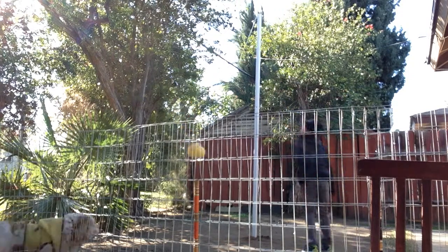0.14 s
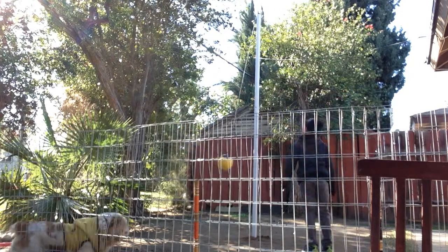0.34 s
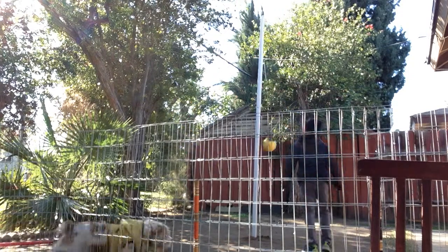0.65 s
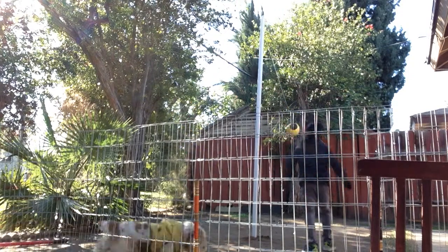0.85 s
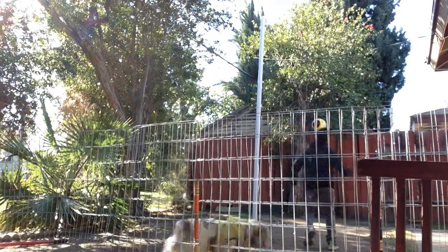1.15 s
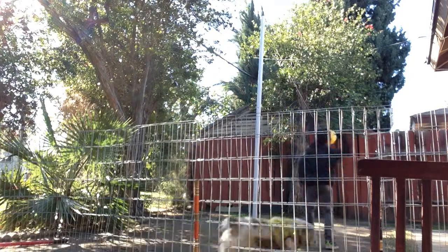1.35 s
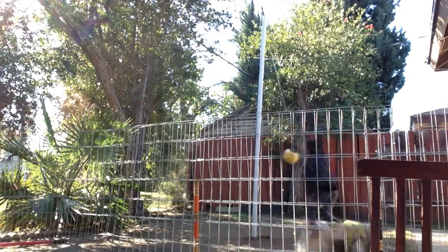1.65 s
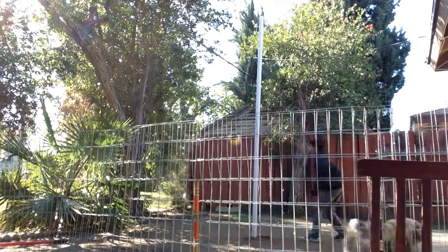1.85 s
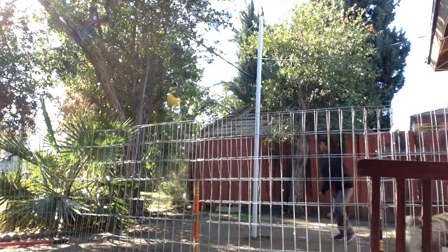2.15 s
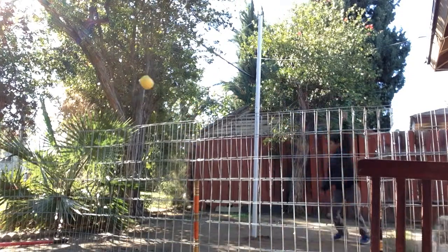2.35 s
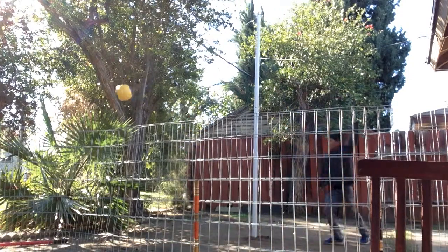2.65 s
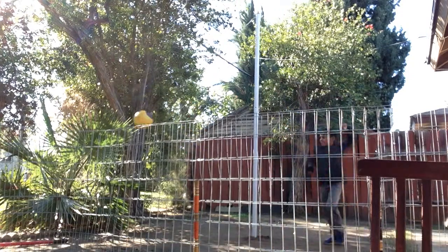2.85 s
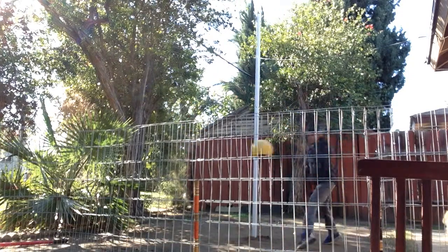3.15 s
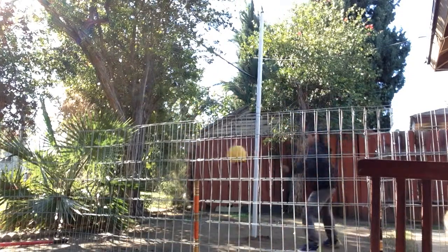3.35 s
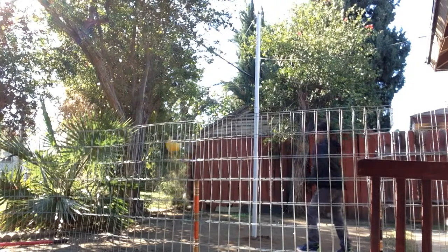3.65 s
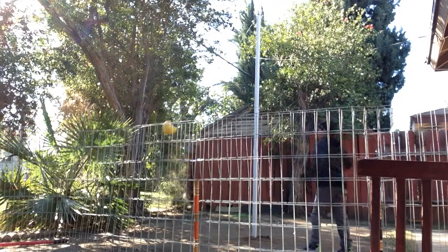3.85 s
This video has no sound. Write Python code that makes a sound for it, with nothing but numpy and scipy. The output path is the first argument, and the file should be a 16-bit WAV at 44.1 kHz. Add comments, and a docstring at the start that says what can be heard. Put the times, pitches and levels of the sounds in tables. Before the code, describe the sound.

A tetherball is played in a quiet yard with a short echo. The rope's metal fitting clinks on the pole early on, and the rope whooshes faintly at 1 second. A hand slaps the hollow ball at 1.6 seconds and harder at 3.3, each a thump with a ping. Ringing clinks recur, loudest at 2.3 and 3.4 seconds. Shoes scuff and pad softly over a faint outdoor hush.

```python
"""Tetherball in a fenced back yard

A hand slaps the hollow ball twice, making it thump and ping. The rope's metal fitting clinks on
the pole and sets it ringing, and the rope whooshes once through the air. Shoes scuff and pad on
the ground over a faint outdoor hush. The fences and the house wall throw the sound back."""
import sys
import numpy as np
from scipy import signal
from scipy.fft import rfft, irfft, next_fast_len
from scipy.io import wavfile
from scipy.ndimage import uniform_filter1d

SR = 44100
rng = np.random.default_rng(int(sys.argv[2]) if len(sys.argv) > 2 else 0)


def log_audio(samples):
    """Write samples as a 16-bit WAV file to the path given in sys.argv[1]."""
    # one column per channel
    frames = np.atleast_2d(samples).T
    # limit to full scale, then quantise
    limited = np.clip(frames, -1, 1)
    pcm = np.round(limited * 32767).astype(np.int16)
    wavfile.write(sys.argv[1], SR, pcm)


N = 176400
T = np.arange(N) / SR
AGE = T[:SR]  # seconds since a sound began

# Levels in the tables are relative. A fade time is how long a sound takes to drop by 60 dB.
# Tone curves of the hush, the fitting's chatter, a scuff, a step, the palm's push and the crack
# on the ball's skin. Each row: frequency in Hz, level in dB.
HUSH_TONE = [(25, -57), (50, -27), (100, -11), (190, 2), (450, -7.5), (1000, -7.5), (1600, -14),
             (3000, -19.5), (6000, -23.5), (11000, -25.5), (15500, -29.5)]
CLINK_TONE = [(200, -24), (700, -14.5), (1050, -3.5), (1750, -6), (2300, -10.5), (3100, -7.5), (4100, -10),
              (5300, -3), (7200, -8), (8600, -4), (10200, -8.5), (12000, -6.5), (15500, -21)]
SCUFF_TONE = [(80, -26), (220, -5.5), (600, -1.5), (1200, -2), (2000, -1.5), (3000, -0.5), (4000, -5.5),
              (5500, -7.5), (8000, -16), (15000, -26.5)]
STEP_TONE = [(40, -19), (100, -3.5), (220, 2), (450, -3), (900, -23.5), (2500, -30.5), (10000, -43)]
SLAP_TONE = [(40, -21), (80, 20.5), (140, 15), (280, 21.5), (600, 9.5), (1100, 7.5), (2400, -6),
             (5000, -36), (16000, -102)]
CRACK_TONE = [(500, -43), (1800, -9), (3100, -3), (4300, -7.5), (7500, -4.5), (10000, -15), (15000, -22.5)]
# The notes of the fitting and of the pole. Each row: pitch in Hz, level in dB, fade time in seconds.
FITTING_NOTES = [(1720, -45, .04), (5480, -45, .05), (5650, -46, .09), (8450, -45, .05), (8885, -44, .07),
                 (9170, -43, .08), (11520, -50, .08), (12315, -49, .09)]
POLE_NOTES = [(1025, -61, .4), (2810, -63, .26), (4785, -57.5, 1.0), (4855, -52, .3), (4994, -55, .16),
              (7675, -52, .34), (7718, -47.5, .33), (8280, -51, .15), (11350, -57, .18)]
# The notes that ring after each slap, from the ball and the yard. Each row: pitch in Hz,
# level in dB, fade time in seconds.
SLAP_NOTES = [(80, -31, .18), (268, -33, .3), (357, -29.5, .09), (432, -32, .15), (475, -33, .17),
              (547, -33, .15), (610, -34, .17), (701, -36, .16), (936, -39, .2), (1125, -34, .1),
              (1238, -36, .12), (1324, -34, .1), (1420, -33, .12), (1530, -36, .07), (1685, -38, .08),
              (1916, -37, .08), (2010, -35, .08), (3036, -40, .09)]
# How the hush swells and sinks. Each row: time in seconds, level in dB.
HUSH_SWELLS = [(0, -1), (.35, -0.5), (.5, -3), (.68, 0), (1.0, -1.5), (1.35, -1.5), (1.9, 1.5), (2.2, -1),
               (2.9, -.5), (3.15, -1.5), (3.5, 4.5), (4, -1.5)]
# The fitting hits the pole. Each row: start in seconds, level in dB, rattle time in seconds,
# then low knock, treble, fitting ring and pole ring, all in dB.
POLE_HITS = [(0.123, -17.5, 0.0066, -8.5, -15.5, -12, -12), (0.6978, -9, 0.0015, -3.5, -12, 4, -8),
             (1.744, -19, 0.0069, -4, -2.5, -15, -8), (2.2807, -0.5, 0.0055, 0.5, 3, 12.5, -4),
             (2.569, -21, .005, 5, -9, -15, -21), (3.009, -22.5, 0.0055, 0, -7.5, 5, -3),
             (3.353, -14.5, 0.0072, -30, 2.5, -10, 2), (3.4472, -1.5, 0.00085, -5, -3, -14, 6.5),
             (3.739, -26, 0.0025, 4, 12, 11, -24), (3.8573, -17.5, 0.0028, 2.5, 0, 8, -14)]
# Shoes drag. Each row: peak, rise and fall times in seconds, then level, bass and grit in dB.
SHOE_DRAGS = [(.235, 0.067, 0.047, -54.5, 10, -5), (0.974, 0.035, 0.074, -59, 1, 12.5),
              (1.458, 0.022, 0.025, -52.5, -2.5, -1), (1.84, 0.017, 0.0098, -58.5, 2, 11.5),
              (1.952, 0.021, 0.02, -48.5, 3.5, 1.5), (2.671, 0.019, 0.008, -46, 7, -2.5),
              (3.618, 0.038, 0.029, -42.5, 9, -1.5), (3.86, 0.045, 0.069, -58.5, -3, 6)]
# Feet land. Each row: start in seconds, level in dB, settling time in seconds, brightness in dB.
FOOTFALLS = [(0.711, -6, 0.02, -11), (0.815, -7, 0.21, -13), (0.941, -7, .035, -18),
             (1.222, -15, 0.0093, -20), (1.888, -18, 0.069, -2), (3.2517, -5.5, 0.0025, 13)]
# The hand hits the ball. Each row: start in seconds, level and slap notes' level in dB, muffling in
# dB per second per kHz, ping in Hz and dB, thump in Hz and dB, the thump's fade time in seconds,
# clap in Hz and dB, crack in dB, echo of the slap and crack in dB.
HAND_HITS = [(1.6358, -7.5, -6, 750, 956, -24, 200, -33, 0.49, 1310, 6.5, 0, -0.5),
             (3.2997, -3.5, 0, 0, 1025, -17, 283, -24, 0.16, 1800, 4.5, 7.5, -2.5)]
# Echoes off the ground, fences and wall. Each row: delay in seconds, level in dB.
YARD_ECHOES = [(.0034, -17), (.0088, -5), (0.014, -10.5), (0.019, -9.5), (.0245, -8), (.0605, -17.5)]
# Sound scattered round the yard. Each row: frequency in Hz, level in dB, fade time in seconds.
YARD_SCATTER = [(100, -2, 0.15), (302, 4.5, 0.32), (970, 5.5, 0.18), (3160, 4, 0.36), (8200, 0, 0.24),
                (16000, 8, 0.17)]


def from_db(db):
    """Turn decibels into a number to multiply by."""
    return 10 ** (np.asarray(db) / 20)


def unit(x):
    """Scale a sound to an energy of one."""
    return x / np.sqrt(np.sum(x ** 2) + 1e-20)


def at_hz(table, hz, column=1):
    """Read between a table's rows, with octaves evenly spaced."""
    rows = np.array(table)
    return np.interp(np.log(hz + 1), np.log(rows[:, 0]), rows[:, column])


def colour(x, *curves):
    """Filter a sound with the sum of the given tone curves."""
    n = next_fast_len(len(x)) * 2
    hz = np.arange(n // 2 + 1) * SR / n
    cepstrum = irfft(np.log(from_db(sum(at_hz(curve, hz) for curve in curves))))
    # Folding this in half keeps the filter from ringing before the sound starts.
    cepstrum[1:n // 2] *= 2
    cepstrum[n // 2 + 1:] = 0
    return irfft(rfft(x, n) * np.exp(rfft(cepstrum)))[:len(x)]


def add(out, start, x):
    """Mix a sound in at its start time in seconds."""
    i = int(np.clip(start * SR, 0, N - 1))
    out[i:i + len(x)] += x[:N - i]


def contact(settle_s, first):
    """Two things meet: a first touch, then a dying run of smaller ones, evened out in tone."""
    touches = unit(rng.standard_normal(SR) * (rng.random(SR) < .25) * np.exp(-AGE / settle_s))
    touches[0] += first
    power = uniform_filter1d(np.abs(rfft(touches)) ** 2, size=300)
    flatten = np.c_[1 + np.arange(len(power)), -10 * np.log10(power)]
    return unit(colour(touches, flatten))


def ring(notes, spread_db=0):
    """Notes ring as fading sine waves; spread_db varies their strengths by chance."""
    extra_db = spread_db * rng.standard_normal(len(notes))
    phases = rng.random(len(notes))
    return sum(from_db(db + extra - 60 * AGE / fade_s) * np.sin(2 * np.pi * (hz * AGE + phase))
               for (hz, db, fade_s), extra, phase in zip(notes, extra_db, phases))


def outdoor_hush(level_db=-59.5):
    """Distant traffic and leaves blur into noise that gently swells and sinks."""
    swell_db = np.interp(T, *np.transpose(HUSH_SWELLS))
    noise = unit(colour(rng.standard_normal(N), HUSH_TONE)) * np.sqrt(N)
    return from_db(level_db + swell_db) * noise


def clinks():
    """The metal fitting chatters against the pole for a moment, and both ring."""
    out = np.zeros(N)
    for start, db, rattle_s, knock_db, treble_db, fitting_db, pole_db in POLE_HITS:
        chatter = yard(colour(contact(rattle_s, first=0.3), CLINK_TONE), echo_db=-1)
        fitting = from_db(fitting_db) * ring(FITTING_NOTES, spread_db=2.5)
        pole = from_db(pole_db) * ring(POLE_NOTES)
        build = 1 - np.exp(-AGE / rattle_s)
        clink = chatter + from_db(pole_db) * pole_zing() + (fitting + pole) * build
        tilt = [(1700, knock_db), (4500, 0), (6500, 0), (12000, treble_db)]
        add(out, start, from_db(db) * colour(clink, tilt))
    return out


def pole_zing(start_hz=9030, fall_hz_per_s=270000, peak_s=0.0022):
    """High bending waves run along the pole fastest and arrive first, so a tiny chirp falls."""
    swell = AGE / peak_s * np.exp(1 - AGE / peak_s)
    return from_db(-34) * swell * np.sin(2 * np.pi * (start_hz - fall_hz_per_s * AGE / 2) * AGE)


def scuffs(grains_per_s=1700, spread_db=7):
    """Soles drag over grit: a crowd of tiny clicks swells and fades."""
    out = np.zeros(N)
    for peak, rise_s, fall_s, db, bass_db, grit_db in SHOE_DRAGS:
        clicks = (rng.random(N) < grains_per_s / SR) * rng.choice([-1, 1], N)
        grains = clicks * from_db(spread_db * rng.standard_normal(N))
        tilt = [(500, bass_db), (2000, 0), (3500, 0), (9000, grit_db)]
        rub = unit(colour(grains, SCUFF_TONE, tilt)) * np.sqrt(N)
        width_s = np.where(T < peak, rise_s, fall_s)
        swell = np.exp(-.5 * np.abs((T - peak) / width_s) ** 2.06)  # a power near 2 rounds the top
        out += from_db(db - 6.5) * rub * swell
    return out


def footsteps():
    """Shoes land on packed earth with dull pads."""
    out = np.zeros(N)
    for start, db, settle_s, bright_db in FOOTFALLS:
        pad = colour(contact(settle_s, first=0.8), STEP_TONE, [(250, 0), (600, bright_db)])
        add(out, start, from_db(db - 4.5) * pad)
    return out


def rope_whoosh(peak_s=.988, width_s=0.025, hz=445, rise_hz_per_s=900, wobble_hz=95):
    """The rope sheds a soft band of noise that rises in pitch as it speeds up."""
    wobble = signal.sosfilt(signal.butter(2, wobble_hz, fs=SR, output="sos"), rng.standard_normal((2, N)))
    phase = 2 * np.pi * np.cumsum(hz + rise_hz_per_s * (T - peak_s)) / SR
    rush = wobble[0] * np.cos(phase) + wobble[1] * np.sin(phase)
    swell = np.exp(-.5 * ((T - peak_s) / width_s) ** 2)
    return from_db(-57.5) * unit(rush * swell) * np.sqrt(width_s * SR)


def ball_slaps(ping_fade_s=0.11, build_s=0.0049, clap_ratio=1.76):
    """The palm pushes and cracks on the skin; the ball thumps and the air inside it pings."""
    out = np.zeros(N)
    for (start, db, notes_db, muffle, ping_hz, ping_db, thump_hz, thump_db, thump_fade_s,
         clap_hz, clap_db, crack_db, echo_db) in HAND_HITS:
        # Air squeezed from under the palm boosts one band: the clap.
        clap = [(clap_hz / clap_ratio, 0), (clap_hz, clap_db), (clap_hz * clap_ratio, 0)]
        slap = colour(contact(0.002, first=1), SLAP_TONE, clap)
        crack = from_db(crack_db) * colour(contact(0.0013, first=0.19), CRACK_TONE)
        # When the hand stays on the ball, the slap's notes fade sooner, the high ones most.
        notes = [(hz, level, 60 / (60 / fade_s + muffle * hz / 1000))
                 for hz, level, fade_s in SLAP_NOTES]
        tones = ring([(thump_hz, thump_db, thump_fade_s), (ping_hz, ping_db, ping_fade_s)])
        tones += from_db(notes_db) * ring(notes)
        tones *= 1 - np.exp(-AGE / build_s)  # the ringing swells as the palm lets go
        add(out, start, -from_db(db) * (yard(slap + crack, echo_db) + yard(tones, echo_db=-13)))
    return out


def yard(x, echo_db=0, slat_feedback=.6, far_fade_s=0.59, build_s=0.0011):
    """The yard adds a few echoes, scattered sound that is new each time, and a faint far tail."""
    response = np.zeros(SR)
    for delay, db in YARD_ECHOES:
        response[int(delay * SR)] += from_db(db)
    for lag in (13, 31, 53):  # fence slats smear each echo; lags are in samples
        allpass = np.r_[slat_feedback, np.zeros(lag - 1), 1]
        response = signal.lfilter(allpass, allpass[::-1], response + 1e-18)
    edges_hz = np.geomspace(50, 18000, 9)
    far = unit(from_db(-60 * AGE / far_fade_s)) * from_db(-16)
    for low, high in zip(edges_hz, edges_hz[1:]):
        hz = np.sqrt(low * high)
        band = signal.butter(2, [low, high], "band", fs=SR, output="sos")
        noise = signal.sosfilt(band, rng.standard_normal(SR))
        fade_s = at_hz(YARD_SCATTER, hz, column=2)
        near = unit(from_db(-60 * AGE / fade_s) * (1 - np.exp(-AGE / build_s)))
        gain = from_db(at_hz(YARD_SCATTER, hz)) * np.sqrt(2 * (high - low) / SR)
        response += gain * unit(noise * np.hypot(near, far))
    return x + from_db(echo_db) * signal.fftconvolve(x, response)[:len(x)]


def scene():
    """The game in the yard, over the hush, in one channel."""
    game = ball_slaps() + clinks() + yard(scuffs() + footsteps() + rope_whoosh())
    return (game + outdoor_hush())[None]


def record(dry, low_hz=66, high_hz=15400):
    """The microphone loses the deep bass and the highest treble."""
    thin = signal.sosfilt(signal.butter(8, low_hz, "high", fs=SR, output="sos"), dry)
    return signal.sosfilt(signal.ellip(10, .2, 70, high_hz, fs=SR, output="sos"), thin)


dry = scene()
out = record(dry)
log_audio(out)
```